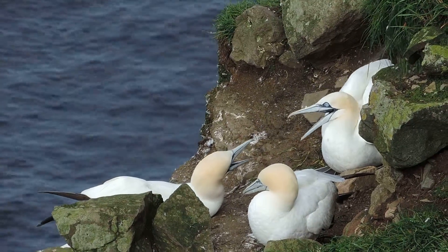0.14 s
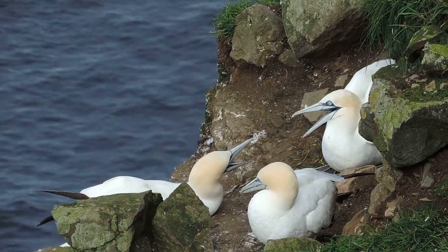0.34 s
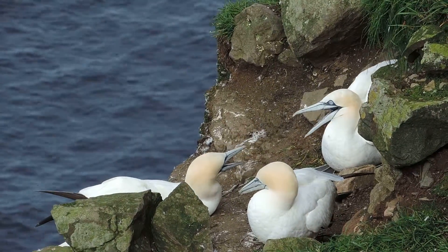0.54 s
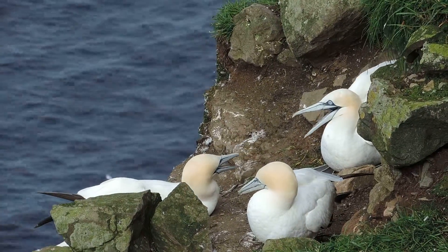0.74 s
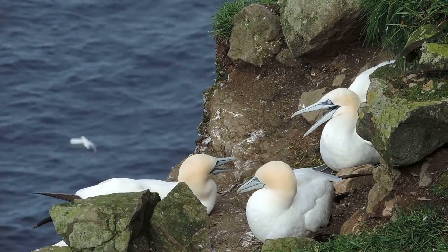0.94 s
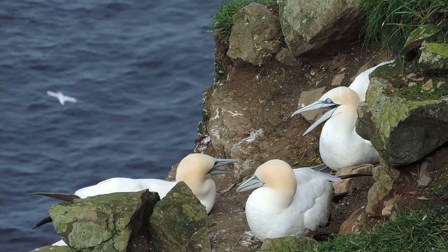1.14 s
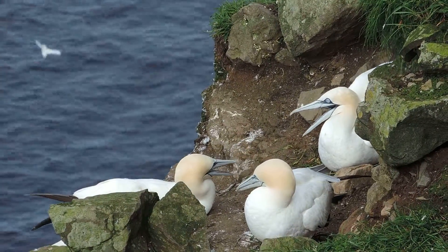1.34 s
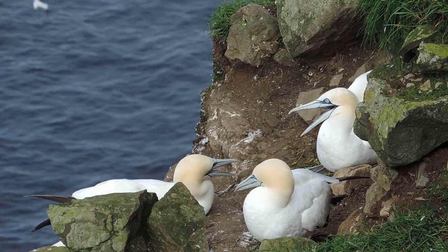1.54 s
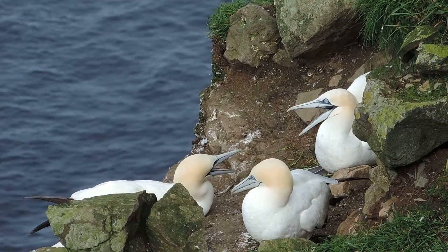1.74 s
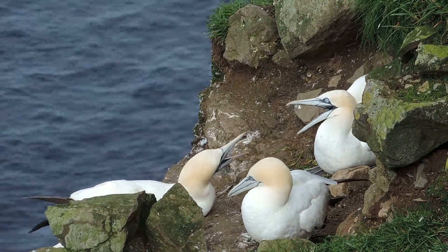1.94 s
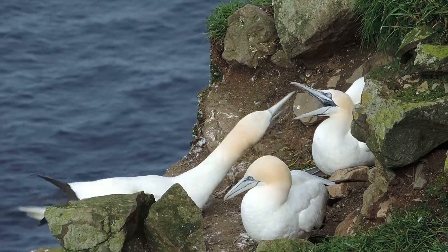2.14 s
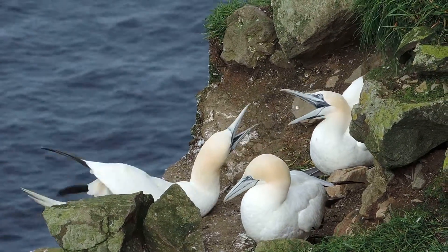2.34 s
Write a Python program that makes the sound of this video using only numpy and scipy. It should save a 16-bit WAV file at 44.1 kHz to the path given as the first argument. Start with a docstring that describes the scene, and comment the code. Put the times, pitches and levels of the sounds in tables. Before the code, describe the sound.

A gannet close by gives two harsh rolled croaks and a fainter third in the first second, with short cliff echoes; wind then thumps the microphone, mostly on the right, over surf hiss and distant bird chatter.

```python
"""Seabirds on a windy cliff

A large seabird gives two harsh rolled calls and a fainter third, between the end of one call and the
start of another: jittered pulses and gated noise ring in throat, mouth and bill, with cliff echoes.
Far birds chatter in short husky notes of tone and noise; surf hisses below as flickering noise bands.
Gusts buffet two microphone ports, mostly the right: random eddies through bands that follow the wind."""
import sys
import numpy as np
from scipy import signal
from scipy.io import wavfile
from scipy.ndimage import uniform_filter1d

SR = 44100
rng = np.random.default_rng(int(sys.argv[2]) if len(sys.argv) > 2 else 0)


def output_pcm(signal):
    """Save a mono or channel-first signal as 16-bit PCM at the path in sys.argv[1].

    Samples are clipped to [-1, 1] before scaling.
    """
    pcm = np.clip(np.atleast_2d(signal).T, -1, 1) * 32767
    wavfile.write(sys.argv[1], SR, np.round(pcm).astype(np.int16))


def ratio_of_db(decibels):
    """Turn decibels (scalar or array-like) into linear amplitude factors; 0 dB maps to 1."""
    return 10 ** (np.asarray(decibels, float) / 20)


N = 105840

# one list per harsh call: time_s, level_db, pitch_hz, mouth_above_level_db, treble_above_level_db
CALL_CURVES = [
    [(0, -39.5, 279.8, -18, -38), (.012, -47, 277.9, -26, -27.5), (.022, -45, 275, -4, -21),
     (.034, -57, 271.8, -12, -24), (.06, -55, 267.8, -16, -28)],
    [(.106, -58, 287.8, -16, -28), (.112, -42, 287.2, -20, -39), (.13, -38, 283.6, -13, -31),
     (.15, -39, 292.7, -14, -25), (.163, -57, 293.6, -2, -28), (.169, -32.5, 298.1, -14, -20),
     (.174, -32, 286.8, 0, -23), (.184, -42, 280.4, -10, -41), (.19, -51, 283, -24, -26),
     (.196, -48, 290.2, -1, -22), (.2, -34.5, 293.2, -3, -6.5), (.21, -33.5, 285.9, -6, -43),
     (.228, -35.5, 282.4, -15, -17), (.244, -35, 274.7, -13, -17.5), (.256, -36, 272.4, -15, -28),
     (.272, -51, 262.8, -9, -38), (.285, -58, 264, -18, -28)],
    [(.367, -81, 323.1, -21, -14), (.374, -44.5, 326.9, -23, -32), (.388, -47.5, 313.5, -14, -33),
     (.398, -38.5, 309.4, -12, -30), (.41, -42, 305.4, -2, -22), (.418, -56, 297.2, -17, -21),
     (.426, -53, 302.6, -14, -21), (.43, -33.5, 294.8, 4, -20.5), (.442, -41, 292.8, -3.5, -18),
     (.448, -56, 299.9, -16, -29), (.454, -52, 298.4, -7, -26), (.458, -37, 299, 3, -13),
     (.47, -39.5, 300, 1.5, -20), (.478, -37.5, 290.8, -10, -30), (.502, -39.5, 278.6, 3, -20),
     (.515, -46, 267.8, -15.5, -25.5), (.56, -51, 262.5, -23, -30)],
    [(.622, -64, 304, -14, -30), (.63, -57, 303.8, -17.5, -36), (.666, -52, 308, -6, -19),
     (.678, -65, 301.6, -12, -33), (.69, -57, 299, -5, -17), (.702, -51.5, 298.2, -6, -28),
     (.712, -69, 300, -7, -21), (.719, -55, 288.6, -1.5, -17.5), (.74, -59, 291.8, -5.5, -25.5),
     (.766, -51, 279.6, -16, -30), (.776, -66.5, 278.2, -22.5, -20.5), (.79, -53.5, 273, -18.5, -36),
     (.81, -63.5, 264.8, -22, -34.5)],
    [(2.35, -69, 300, -16, -26), (2.37, -55, 299.5, -14, -20), (2.385, -52, 297, -8, -10),
     (2.4, -56, 297, -14, -15)],
]
# share of noise in the throat, high in the rolled strokes, low in the held end: time_s, rasp (0-1)
RASP_CURVE = [(0, .5), (.1, .3), (.165, .4), (.2, .45), (.215, .15), (.28, .15), (.37, .45), (.44, .3),
              (.46, .3), (.475, .15), (.56, .15), (.62, .45), (.72, .35), (.8, .2), (2.3, .6)]
# throat resonances: centre_hz, width_hz, relative_db
THROAT_RESONANCES = [(873, 270, -4.5), (1207, 130, 4.5), (1446, 135, 6), (1622, 272, 3.5),
                     (2050, 500, -3.5)]
# mouth resonances: centre_hz, width_hz, relative_db
MOUTH_RESONANCES = [(2490, 490, 11), (3100, 250, 0.5), (3760, 130, -13)]
# bill resonances: centre_hz, width_hz, relative_db
BILL_RESONANCES = [(4730, 420, 11), (5880, 820, 13.5), (8400, 3000, -18), (11500, 3600, -17)]
# reflections of the calls off the cliff: delay_s, level_db
CLIFF_ECHOES = [(.011, -17.5), (.023, -16.5), (.037, -31), (.058, -34)]

# level of the background hiss, which sinks and then recovers: time_s, level_db (before a fixed lift)
BACKGROUND_LEVEL = [(0.0, -70), (0.37, -69), (0.76, -79.5), (0.94, -82.5), (1.26, -81), (1.64, -72),
                    (1.92, -70), (2.4, -70.5)]
# colour of the surf: centre_hz, relative_db
SURF_COLOUR = [(71, -29.5), (120, -5.5), (198, -28.5), (242, 5.5), (302, -5), (400, -3), (1050, -4),
               (2070, -11.5), (3030, -24.5), (13100, -36.5), (14500, -43)]
# how alike the surf is at the two ports: centre_hz, likeness (0-1)
SURF_LIKENESS = [(100, .3), (300, 0.86), (700, 0.99), (1600, 0.42), (3000, 0.44), (5000, 0.2), (9000, 0.1),
                 (14000, 0.12)]
# surf balance: centre_hz, left_minus_right_db
SURF_PAN = [(60, 0), (180, -4.5), (530, 0.5), (1590, -4.5), (4750, 7.5), (14200, -5)]

# wind on the left port: time_s, gust_db
LEFT_GUST = [(0, -32), (.06, -57), (.09, -30.5), (.17, -45), (.24, -34), (.35, -34.5), (.5, -31.5),
             (.68, -39.5), (.82, -48), (.9, -38.5), (1.1, -52), (1.22, -47), (1.45, -63), (1.6, -54),
             (1.7, -50), (1.9, -47), (2.05, -48), (2.13, -32), (2.25, -54.5), (2.4, -43)]
# wind on the right port: time_s, gust_db (before its exposure is added), deep_bass_boost_db
RIGHT_GUST = [(0.0, -41, 3), (0.09, -55.5, 19.5), (0.17, -66, -3), (0.28, -36, 9), (0.35, -45.5, 8.5),
              (0.51, -15.5, -4), (0.53, -17.5, -7), (0.56, -13.5, 3.5), (0.59, -17.5, -19),
              (0.64, -22.5, -5), (0.69, -12.5, -9.5), (0.71, -20.5, 0), (0.76, -23.5, -19.5),
              (0.78, -27.5, 5), (0.83, -22.5, -2), (0.89, -27.5, -6.5), (1.15, -44.5, 5), (1.18, -38.5, -8),
              (1.26, -47.5, -9), (1.29, -40, 4), (1.43, -64.5, 10), (1.61, -63.5, 6.5), (1.64, -30.5, -2.5),
              (1.69, -43, 7.5), (1.75, -27.5, -7.5), (1.83, -30, 4), (1.88, -40, 10.5), (1.93, -49, 4),
              (2.12, -34.5, 14), (2.17, -37, 2), (2.23, -50, 6.5), (2.4, -43, 5)]
# single eddies at set times on the right port, most of them strong: time_s, above_smallest_eddy_db
THUMPS = [(.1, 23), (0.488, 6), (0.503, 11), (.563, 15), (0.652, 11.5), (.689, 4), (.82, 14), (0.836, 15),
          (0.923, 12.5), (0.94, 18), (1.182, 16.5), (1.292, 13.5), (1.65, 12.5), (1.748, 13)]
# wind colour and how steeply each band follows the gust: centre_hz, relative_db, follow_db_per_db
WIND_BANDS = [(24.3, 4, 1.01), (52.5, 3, 0.8257), (105.1, 2, 0.9875), (212.8, -10.5, 1.5179),
              (432, -23, 1.3416), (850, -45, 1.438), (1550, -59, 1.4017), (3200, -86, 1.4)]

# notes of far birds: start_s, relative_level_db, pitch_hz
CHATTER_NOTES = [(0.0191, -35.5, 1850), (0.0473, -41, 2160), (0.284, -39, 1760), (0.8993, -49.5, 1430),
                 (0.9471, -45, 1860), (0.989, -51, 2000), (1.0244, -54, 2030), (1.2347, -47.5, 1910),
                 (1.274, -47.5, 1960), (1.3149, -47, 1970), (1.4621, -49, 1880), (1.506, -44.5, 1364),
                 (1.5723, -46.5, 2050), (1.6122, -47, 2160), (1.6487, -45.5, 2140), (1.6896, -43, 2100),
                 (1.7248, -42, 1916), (1.7614, -43, 1935), (1.7811, -31, 1440), (1.8267, -37.5, 1907),
                 (1.8674, -43, 1520), (1.9875, -41.5, 2060), (2.0238, -44, 1950), (2.0567, -41.5, 1984),
                 (2.1034, -35, 1740), (2.148, -37, 1900), (2.1875, -43.5, 1380), (2.3741, -46.5, 1320)]

LOW_LAG_S, HIGH_LAG_S = .00003, .00014   # the right port hears later


def rms_one(x):
    """Scale to rms 1."""
    return x / np.sqrt(np.mean(x ** 2) + 1e-20)


def in_time(rows):
    """Draw each column of a curve out to every sample."""
    s, *columns = np.transpose(rows)
    return [np.interp(np.arange(N) / SR, s, column) for column in columns]


def at_hz(points, hz):
    """Read a two-column table on a log-frequency axis."""
    table_hz, values = np.transpose(points)
    return np.interp(np.log(hz), np.log(table_hz + 1), values)


def drift(rate_hz):
    """Smooth random wander of spread 1: low-passed noise made at a twentieth of the sample rate."""
    r = np.exp(-40 * np.pi * rate_hz / SR)
    noise = rng.standard_normal(N // 20 + 2002)
    slow = signal.lfilter([1], [1, -2 * r, r * r], noise)[2000:]   # drop the filter's settling
    return np.interp(np.arange(N) / 20, np.arange(len(slow)), rms_one(slow))


def resonate(x, hz, width_hz):
    """Ring one resonance with a gain near 1 at its top."""
    r = np.exp(-np.pi * width_hz / SR)
    feedback = [1, -2 * r * np.cos(2 * np.pi * hz / SR), r * r]
    return signal.lfilter([(1 - r * r) / 2, 0, (r * r - 1) / 2], feedback, x)


def band(x, low_hz, high_hz):
    """Keep one band of the spectrum."""
    return signal.sosfilt(signal.butter(2, [low_hz, high_hz], "band", fs=SR, output="sos"), x)


def place(x, pan_db, lag_s):
    """Pan by left-minus-right level; the right port hears the sound later."""
    left, right = np.broadcast_to(x, (2, N))
    late = np.interp(np.arange(N) - lag_s * SR, np.arange(N), right)
    return np.array([left * ratio_of_db(pan_db / 2), late * ratio_of_db(-pan_db / 2)])


def ring_tract(drive, resonances, alternate):
    """Sum parallel resonances, each swelling and fading on its own, and trim to their range."""
    waver_db, waver_hz = 1.8, 15
    ringing = 0
    for k, (hz, width_hz, db) in enumerate(resonances):
        sign = (-1) ** k if alternate else 1
        gain = ratio_of_db(db + waver_db * drift(waver_hz))
        ringing = ringing + sign * gain * resonate(drive, hz, width_hz)
    return rms_one(band(ringing, resonances[0][0] * 0.59, resonances[-1][0] * 1.9))


def cliff_echoes(voice):
    """Add delayed, band-limited copies of the voice, on left and right by turns."""
    out, dull = voice.copy(), band(voice, 550, 4800)
    for k, (delay_s, db) in enumerate(CLIFF_ECHOES):
        delay, side = int(delay_s * SR), k % 2
        out[side, delay:] += ratio_of_db(db) * dull[side, :N - delay]
    return out


def calls():
    """Jittered pulses with noise gated each cycle ring in throat, mouth and bill."""
    jitter, shimmer_db = .012, 1.5   # spread of the pitch as a fraction, spread of the pulse level
    upper_rasp = .35   # extra share of noise in mouth and bill
    level_db, pitch_hz, mouth_db, treble_db = in_time(np.concatenate(CALL_CURVES))
    rasp, = in_time(RASP_CURVE)
    t = np.arange(N) / SR
    sounding = sum((t > call[0][0]) & (t < call[-1][0]) for call in CALL_CURVES)
    gate = uniform_filter1d(sounding * 1., size=200)

    phase = np.cumsum(pitch_hz * (1 + jitter * drift(120))) / SR
    pulses = rms_one(np.diff(np.floor(phase), prepend=0) * ratio_of_db(shimmer_db * drift(150)))
    puff = rms_one(rng.standard_normal(N) * np.exp(-1.6 * (phase % 1)))   # noise dies away each cycle

    # resonances, added noise share, level above the call in dB, pan in dB, lag in s
    parts = ((THROAT_RESONANCES, 0, 0, -3.5, LOW_LAG_S),
             (MOUTH_RESONANCES, upper_rasp, mouth_db, -3.5, .00008),
             (BILL_RESONANCES, upper_rasp, treble_db, 5, .00018))
    voice = 0
    for resonances, more_rasp, above_db, pan_db, lag_s in parts:
        noisy = np.clip(rasp + more_rasp, 0, 1)
        drive = np.sqrt(1 - noisy ** 2) * pulses + noisy * puff
        ringing = ring_tract(drive, resonances, alternate=more_rasp == 0)
        voice = voice + place(ringing * ratio_of_db(level_db + above_db) * gate, pan_db, lag_s)
    return cliff_echoes(voice)


def surf():
    """Half-octave bands of far wave noise, each with its own flicker, likeness and balance."""
    lift_db, lag_split_hz = 24.5, 2400
    out, together = 0, drift(5.3)
    edges = 100 * 2 ** np.arange(0, 7.6, .5)
    white = rng.standard_normal((2, 2, N))   # neighbouring bands take different noise
    for k, (low, high) in enumerate(zip(edges, edges[1:])):
        mid, side = band(white[k % 2], low, high)
        hz = np.sqrt(low * high)
        alike = np.clip(at_hz(SURF_LIKENESS, hz), 0, 1)
        stereo = np.sqrt(1 + alike) * mid + np.sqrt(1 - alike) * side * [[1], [-1]]
        gain = ratio_of_db(at_hz(SURF_COLOUR, hz) + 0.2 * together + 0.54 * drift(36))
        lag_s = HIGH_LAG_S if hz > lag_split_hz else LOW_LAG_S
        out = out + place(gain * stereo, at_hz(SURF_PAN, hz), lag_s)
    level_db, = in_time(BACKGROUND_LEVEL)
    return rms_one(out) * ratio_of_db(level_db + lift_db)


def wind(gust_db, deep_db, thumps):
    """Eddies of uneven size hit one port; stronger gusts reach higher in pitch."""
    eddies_per_s, eddy_spread_db = 290, 3
    lump_db, lump_hz = 3.5, 18.8   # lumpiness of the gust, before each band follows it
    deep_below_hz = 65
    hits = rng.random(N) < eddies_per_s / SR
    signs = rng.choice([-1, 1], N)
    sizes = ratio_of_db(eddy_spread_db * np.minimum(rng.exponential(1, N), 3))
    eddies = hits * signs * sizes
    for s, db in thumps:
        eddies[int(s * SR)] = -ratio_of_db(db)
    eddies = rms_one(eddies + 1e-18)

    push_db = gust_db + 28.5 + lump_db * drift(lump_hz)
    out = 0
    for k, (hz, db, follow) in enumerate(WIND_BANDS):
        gain = ratio_of_db(db + follow * push_db + deep_db * (hz < deep_below_hz) - 9.5)
        out = out + (-1) ** k * gain * band(eddies, hz / np.sqrt(2), hz * np.sqrt(2))
    return out


def gusts():
    """Separate wind noise on each port, the right one more exposed."""
    right_exposed_db, left_deep_db = 4.5, 1.5
    left_db, = in_time(LEFT_GUST)
    right_db, right_deep_db = in_time(RIGHT_GUST)
    left = wind(left_db, left_deep_db, [])
    right = wind(right_db + right_exposed_db, right_deep_db, THUMPS)
    return np.array([left, right])


def chatter():
    """Short husky notes of far birds: a tone with noise round it and a rasp above."""
    rise_s, fall_s, husk_width_hz = .003, .009, 250
    rasp_hz, rasp_width_hz = 2700, 550
    early_rasp_db, late_rasp_db, bright_from_s = -28, -12.5, 2.09   # later notes rasp more
    out, t = np.zeros(N + SR), np.arange(int(.06 * SR)) / SR
    shape = (1 - np.exp(-t / rise_s)) * np.exp(-t / fall_s)
    shape = shape / shape.max()
    for s, db, hz in CHATTER_NOTES:
        noise = rng.standard_normal(len(t))
        husk = rms_one(resonate(resonate(noise, hz, husk_width_hz), hz, husk_width_hz))
        rasp = rms_one(resonate(resonate(noise, rasp_hz, rasp_width_hz), rasp_hz, rasp_width_hz))
        rasp_db = early_rasp_db if s < bright_from_s else late_rasp_db
        note = 0.24 * np.sin(2 * np.pi * hz * t) + 0.43 * husk + ratio_of_db(rasp_db) * rasp
        start = int(s * SR)
        out[start:start + len(t)] += ratio_of_db(db) * note * shape
    return place(out[:N], -3, LOW_LAG_S)


def scene():
    """Wind, birds and surf together."""
    buffeting = gusts()
    return calls() + chatter() + surf() + buffeting


def top_cut(x):
    """Nothing passes above the cut-off."""
    return signal.sosfilt(signal.butter(12, 14770, fs=SR, output="sos"), x)


def record(dry):
    """Peaks are softly rounded, then a steep low-pass cuts the top."""
    cutoff_hz = 14700   # where the cut is 70 dB deep
    low_pass = signal.cheby2(12, 70, cutoff_hz, fs=SR, output="sos")
    mix = signal.sosfilt(low_pass, np.tanh(dry))
    return top_cut(mix)


dry = scene()
out = record(dry)
output_pcm(out)
```